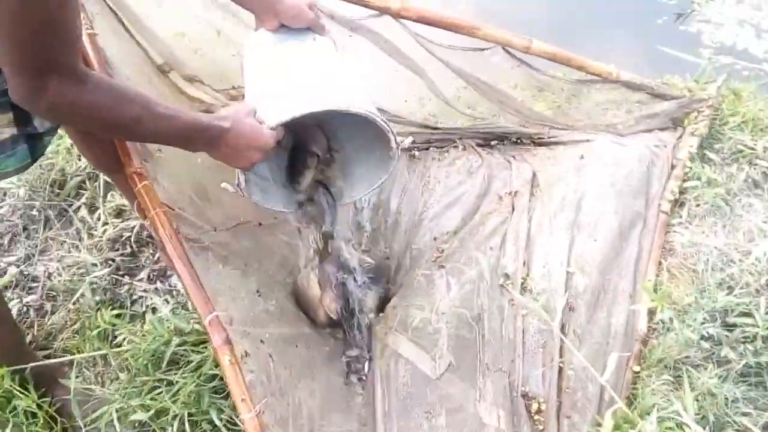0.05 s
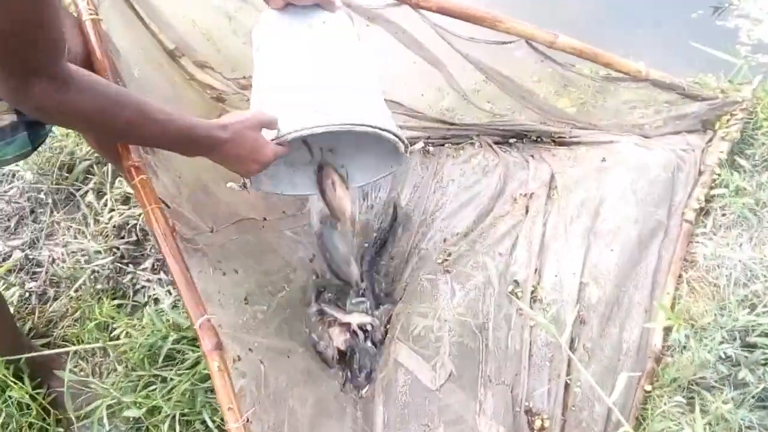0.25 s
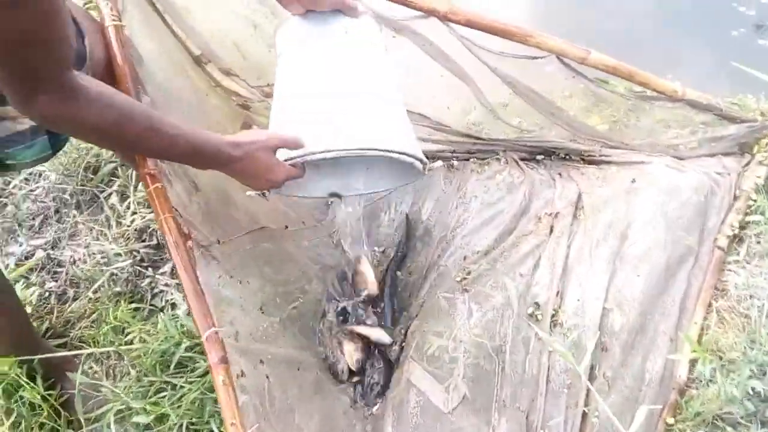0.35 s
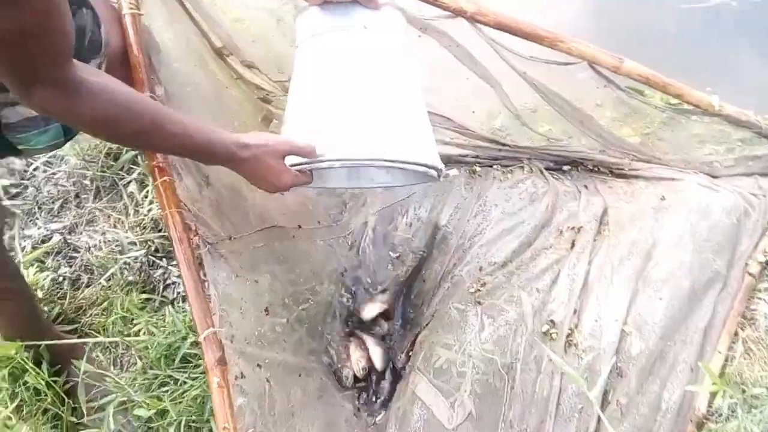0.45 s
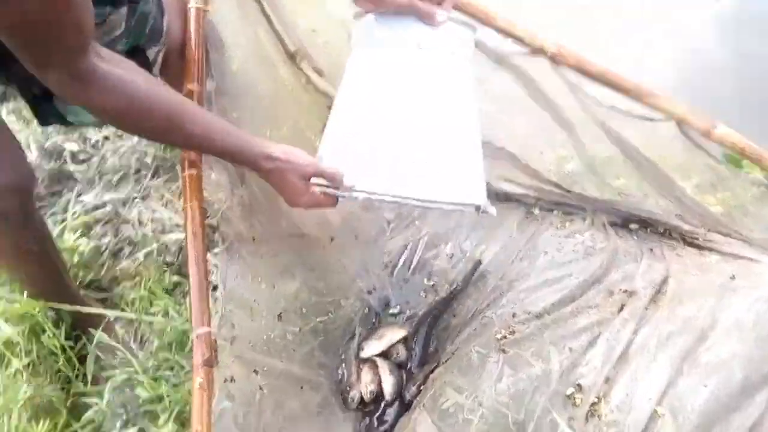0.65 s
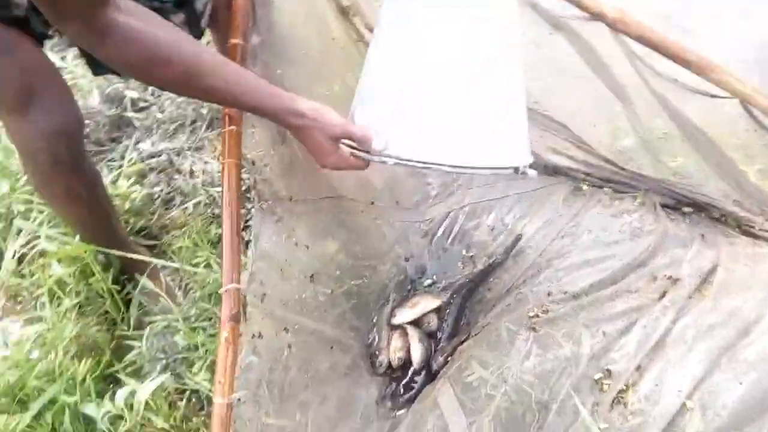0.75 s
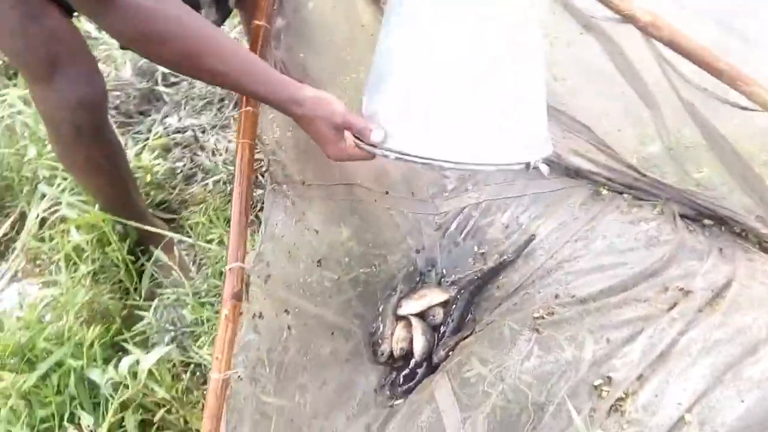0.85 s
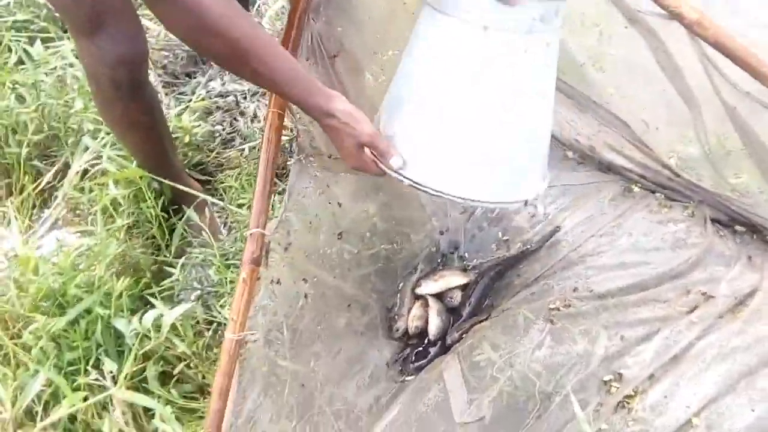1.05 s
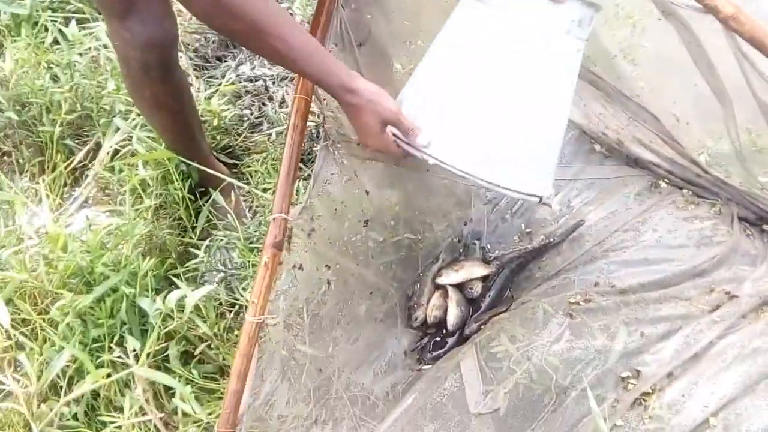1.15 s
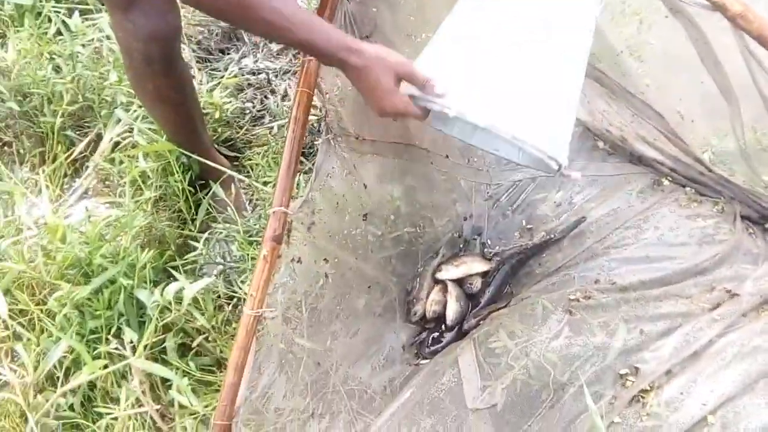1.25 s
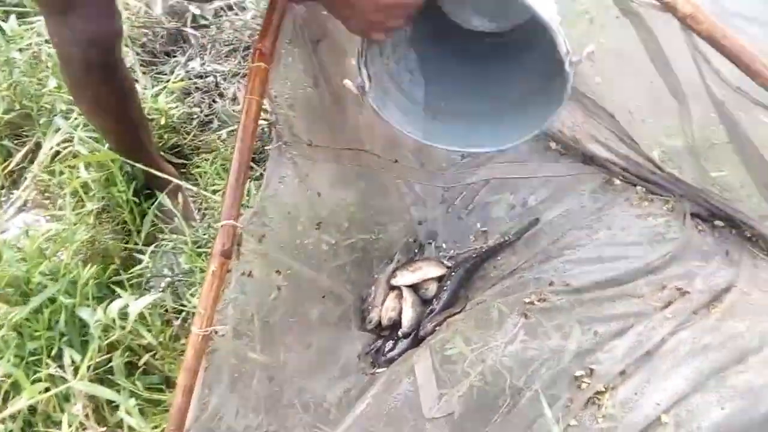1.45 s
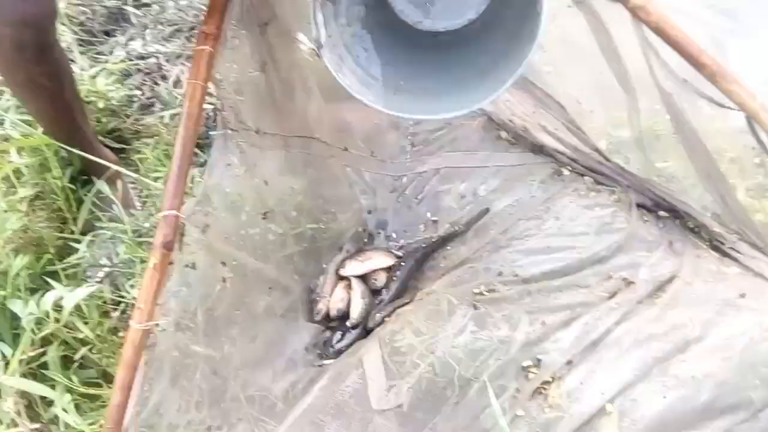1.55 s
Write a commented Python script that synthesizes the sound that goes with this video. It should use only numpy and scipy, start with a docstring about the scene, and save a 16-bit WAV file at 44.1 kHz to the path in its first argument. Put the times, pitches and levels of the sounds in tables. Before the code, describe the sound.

Small wet fish slide and slap onto a net for the first 0.6 seconds, with bubbly pops, ticking droplets and one loud knock of a metal bucket at 0.4. A thin click falls in a lull near 0.75. From 0.9 to 1.3 the bucket knocks several times, barely ringing. The fish flap wetly again around 1.5. Everything is close and echoless, over a soft outdoor hiss and faint low hum.

```python
"""Fish tipped from a bucket

Small wet fish slide out of a metal bucket and slap onto a net beside a pond.
The bucket knocks as it is shaken empty, and the hand holding it keeps the ringing short.
Bubbles pop, droplets tick and the fish wriggle on the wet mesh.
Behind it all are a soft outdoor hiss and a low wavering hum."""
import sys
import numpy as np
from scipy import signal
from scipy.io import wavfile

SR = 44100
rng = np.random.default_rng(int(sys.argv[2]) if len(sys.argv) > 2 else 0)


def wav_out(sig):
    """Save sig, one row per channel (or a flat mono array), as 16-bit PCM at SR to the path in sys.argv[1]."""
    wavfile.write(sys.argv[1], SR, np.round(np.clip(np.atleast_2d(sig).T, -1, 1) * 32767).astype(np.int16))


N = 70560
TIME = np.arange(N) / SR
EDGES = 22 * 2 ** (np.arange(30) / 3)  # Hz, three bands to the octave
CENTRES, WIDTHS = np.sqrt(EDGES[1:] * EDGES[:-1]), np.diff(EDGES)


def from_db(db):
    """Turn decibels into a gain to multiply by."""
    return 10 ** (np.asarray(db) / 20)


def rms_one(x):
    """Scale a signal to an average power of 1."""
    return x / np.sqrt(np.mean(x ** 2) + 1e-20)


def in_time(rows):
    """Join (time, level) points into a gain for every sample."""
    return from_db(np.interp(TIME, *np.transpose(rows)))


def at_hz(points, hz):
    """Read a level between (frequency, level) points, with octaves evenly spaced."""
    freqs, levels = np.transpose(points)
    return np.interp(np.log(hz), np.log(freqs), levels)


def drift(rate):
    """A smooth random wobble of about 1 either way; a higher rate (Hz) wobbles faster."""
    r = np.exp(-20 * np.pi * rate / SR)
    slow = signal.lfilter([1], [1, -2 * r, r * r], rng.standard_normal(N // 10 + 4002))[4000:]
    return np.interp(np.arange(N) / 10, np.arange(len(slow)), rms_one(slow))


def noise_bands():
    """Noise split into equally strong bands, from low to high."""
    white = rng.standard_normal((2, N + SR // 2))
    bands = []
    for k in range(len(CENTRES)):
        band_pass = signal.butter(2, EDGES[k:k + 2], "band", fs=SR, output="sos")
        bands.append(rms_one(signal.sosfilt(band_pass, white[k % 2])[-N:]))
    return np.array(bands)


def band_gains(db_per_hz):
    """Share a total power of 1 among the bands to give noise a tone colour."""
    gain = from_db(db_per_hz) * np.sqrt(WIDTHS)
    return gain / np.linalg.norm(gain)


def fade(age, t60):
    """Die away from age zero; the fade time t60 is the seconds it takes to drop 60 dB."""
    return np.exp(-np.log(1000) * np.clip(age / t60, 0, 10))


def burst(start, swell, t60):
    """A loudness shape that swells, then fades."""
    return np.clip((TIME - start) / swell, 0, 1) * fade(TIME - start - swell, t60)


def ring(clicks, hz, t60):
    """Each click starts a fading tone as strong as itself."""
    r, w = np.exp(-np.log(1000) / (t60 * SR)), 2 * np.pi * hz / SR
    return signal.lfilter([0, np.sin(w)], [1, -2 * r * np.cos(w), r * r], clicks + 1e-18)


# Tone colour of the outdoor hiss: f/Hz, relative level/dB
HISS_COLOUR = [(25, -4.5), (70, 9), (150, 4), (300, -1), (550, -12), (1100, 0.5), (2000, -3), (4000, 2.5),
               (6200, 0), (8000, -9.5), (10000, -13), (12500, -40), (16000, -22)]
# How loud the hum is over time: t/s, level/dB
HUM_LEVELS = [(0, -66), (.12, -59.5), (.42, -56.5), (.55, -73), (.72, -97), (.85, -63), (.91, -55.5),
              (1.14, -56), (1.32, -82), (1.44, -56), (1.6, -67)]


def outdoors(hiss_db=-53.5, flicker_db=3.7, hum_hz=74, waver=0.027, flutter_db=1):
    """A soft flickering hiss, and a low hum that wavers in pitch and loudness."""
    gains = band_gains(at_hz(HISS_COLOUR, CENTRES))
    hiss = sum(g * band * from_db(flicker_db * drift(13)) for g, band in zip(gains, noise_bands()))
    pitch = hum_hz * (1 + waver * drift(8.8))
    hum = np.sqrt(2) * np.sin(2 * np.pi * np.cumsum(pitch) / SR)
    return from_db(hiss_db) * hiss + in_time(HUM_LEVELS) * hum * from_db(flutter_db * drift(18))


# Tone colour of wet skin, sliding or slapping: f/Hz, relative level/dB
WET_TONE = [(100, -16), (300, -4), (520, -27), (850, -11.5), (1200, 0), (2100, 2), (4000, -0.5), (6200, 2),
            (8000, -10.5), (12000, -15), (16000, -23)]
# How loudly fish and water slide, which the spatter follows too: t/s, level/dB
SLIDE_LEVELS = [(0, -51.5), (.06, -48), (.15, -42.5), (.19, -45.5), (.225, -41), (.29, -45.5), (.33, -39.5),
                (.43, -38), (.5, -44.5), (.58, -43), (.61, -49), (.69, -52), (.76, -63), (.85, -62),
                (.93, -51.5), (1.12, -51), (1.25, -54), (1.41, -52), (1.47, -58.5), (1.505, -51),
                (1.54, -42.5), (1.6, -43.5)]


def sliding(pops_per_s=1600, ring_cycles=14.5, spread_db=3.5, flicker_db=3):
    """Tiny bubbles and films of water pop between the sliding fish, over a wet rustle."""
    sizes = from_db(spread_db * np.minimum(rng.exponential(1, N), 4)) * rng.choice([-1, 1], N)
    clicks = sizes * (rng.random(N) < pops_per_s / SR)
    pitches = np.geomspace(1100, 10000, 28)
    chosen = rng.integers(0, len(pitches), N)  # each pop gets a random pitch
    pops = sum(from_db(at_hz(WET_TONE, hz)) * hz * ring(clicks * (chosen == k), hz, ring_cycles / hz)
               for k, hz in enumerate(pitches))
    shared_flicker = 0.79 * drift(89)
    rustle = sum(g * band * from_db(flicker_db * (shared_flicker + drift(44)))
                 for g, band in zip(band_gains(at_hz(WET_TONE, CENTRES)), noise_bands()))
    return from_db(-3.5) * in_time(SLIDE_LEVELS) * (rms_one(pops) + rms_one(rustle))


# Larger droplets flicked onto the mesh: t/s, level/dB, f/Hz
BIG_DROPLETS = [(0.2448, -23, 6500), (0.2505, -24, 7500), (0.268, -29, 8000), (0.321, -24, 7200),
                (0.4385, -26, 8500), (0.465, -24, 5500), (0.5375, -25, 6000), (0.5688, -17, 6000),
                (0.660, -33, 7000)]


def spatter(drops_per_s=110, fine_db=-8, range_hz=(2450, 7000), fade_s=.002):
    """Fine droplets tick on the mesh while the fish move; a few larger ones stand out."""
    clicks = rng.uniform(.2, 1, N) * rng.choice([-1, 1], N) * (rng.random(N) < drops_per_s / SR)
    bright = signal.butter(2, range_hz, "band", fs=SR, output="sos")
    fine = from_db(fine_db) * in_time(SLIDE_LEVELS) * rms_one(signal.sosfilt(bright, clicks + 1e-18))
    big = sum(from_db(db) * (TIME >= t) * fade(TIME - t, fade_s) * np.cos(2 * np.pi * hz * (TIME - t))
              for t, db, hz in BIG_DROPLETS)
    return fine + big


# Fish hitting the net and each other:
# t/s, level/dB, swell/s, fade/s, centre f/Hz, level change away from the centre/dB
FISH_SLAPS = [(0.006, -39.5, 0.0045, 0.078, 4920, -10), (0.133, -40.5, 0.0049, 0.081, 3520, -6),
              (0.2, -38, 0.0045, 0.075, 5100, -11), (0.235, -34, 0.0022, .025, 4800, -19),
              (0.2447, -29.5, 0.00037, 0.01, 7000, -5), (0.2484, -32.5, .001, .035, 6500, -8.5),
              (0.267, -38, 0.0023, 0.02, 7000, -6), (0.2973, -21, 0.0033, 0.012, 4840, -12),
              (0.303, -37, 0.0011, 0.14, 5200, -3), (0.318, -35.5, 0.0022, 0.037, 6500, -14),
              (0.339, -26.5, 0.0026, 0.027, 3600, -12.5), (0.364, -37.5, 0.0037, 0.035, 3300, -11),
              (0.435, -35.5, 0.0017, .05, 6500, -18), (0.47, -31, 0.0034, 0.043, 5460, -3),
              (0.497, -36.5, 0.0017, 0.068, 3500, 2), (0.522, -33, .002, 0.037, 2000, 1),
              (0.529, -31, 0.0053, 0.052, 4540, -10.5), (0.552, -38, .001, 0.037, 3930, -25),
              (0.560, -27.5, 0.0074, 0.026, 3380, -1.5), (0.6176, -37.5, 0.00044, 0.023, 2700, -2),
              (0.902, -44, .001, 0.052, 4270, -1), (1.052, -23.5, 0.0035, 0.047, 7800, -21),
              (1.3748, -40, .001, 0.01, 6000, -10), (1.395, -44.5, 0.0033, 0.2, 6150, -18),
              (1.484, -42, 0.0031, 0.035, 4500, -9), (1.514, -39.5, 0.0021, 0.071, 3500, -5),
              (1.53, -36.5, 0.0062, 0.032, 3240, -5.5)]


def slaps(width_octaves=0.42, rough_db=2.5):
    """Wet skin lands and peels off: a crackling burst of noise shaped around one broad pitch."""
    noise, out = noise_bands(), np.zeros(N)
    crackle = from_db(rough_db * drift(660))
    for start, db, swell, t60, hz, sides_db in FISH_SLAPS:
        hump = np.exp(-.5 * (np.log2(CENTRES / hz) / width_octaves) ** 2)
        gains = band_gains(at_hz(WET_TONE, CENTRES) + sides_db * (1 - hump))
        shape = burst(start, swell, t60)
        slap = shape * crackle * (gains @ noise)
        out += from_db(db) * slap * np.linalg.norm(shape) / np.linalg.norm(slap)
    return out


# Dull bumps: t/s, level/dB, f/Hz, fade/s
DULL_BUMPS = [(0.022, -44.5, 97, .09), (0.246, -38.5, 81, 0.056), (0.299, -46, 168, .03),
              (0.381, -33, 310, .055), (0.995, -43, 280, .05), (0.807, -39.5, 88, 0.055)]


def bumps(swell_s=0.0038):
    """Soft thumps, each a low tone that is gone after a few swings."""
    return sum(from_db(db) * burst(t, swell_s, t60) * np.sin(2 * np.pi * hz * (TIME - t))
               for t, db, hz, t60 in DULL_BUMPS)


# Knocks on the bucket, with levels before the next two tables shape them:
# t/s, thud/dB, clatter/dB, crack/dB, ring/dB, contact/s, crack's fade/s, struck spot's f/Hz
BUCKET_KNOCKS = [(0.076, -53, -40, -46, -50, .004, 0.098, 1110),
                 (0.092, -59, -37.5, -50, -49.5, 0.0036, 0.089, 1250),
                 (0.3803, -31.5, -17.5, -15.5, -27.5, 0.0068, 0.066, 2090),
                 (0.416, -80, -41, -47, -41.5, .012, 0.082, 1200),
                 (0.445, -63, -29, -59, -44.5, 0.011, 0.062, 1100),
                 (0.464, -46, -42, -30, -43.5, .005, 0.037, 1060),
                 (0.860, -50, -37, -55, -51, 0.0022, 0.056, 1250),
                 (0.954, -59, -41, -48, -48.5, 0.0027, .06, 1700),
                 (0.995, -38.5, -30.5, -36.5, -41.5, 0.0057, 0.065, 690),
                 (1.012, -36.5, -49, -40, -40.5, 0.0048, 0.053, 1940),
                 (1.0504, -32.5, -25, -21.5, -26.5, 0.0061, 0.044, 1180),
                 (1.1046, -48, -36, -41, -47, 0.0018, .06, 1470),
                 (1.138, -38, -30.5, -35.5, -45, 0.0027, 0.065, 1700),
                 (1.151, -50, -46, -44, -50, .002, 0.078, 1720),
                 (1.205, -43.5, -47, -59, -65, 0.0027, 0.092, 690),
                 (1.289, -73, -54, -66, -47, .004, .07, 1100),
                 (1.309, -49.5, -31, -41, -43, 0.0051, 0.068, 1560),
                 (1.349, -69, -53, -60, -48.5, 0.0034, 0.054, 1110)]
# Tone colour of a knock's noise: f/Hz, relative level/dB
KNOCK_TONE = [(60, -7), (150, -4.5), (300, 6), (470, -3), (750, 1.5), (1100, -2), (2000, 0.5), (2700, -6.5),
              (4000, -2.5), (6200, -8.5), (8500, -21), (12000, -28.5), (16000, -33)]
# Tones the bucket wall rings with: f/Hz, relative level/dB, fade/s
WALL_TONES = [(315, -21, .045), (568, -17, 0.12), (702.4, -15, 0.11), (850, -15.5, 0.11),
              (1061.4, -9, 0.069), (1128.6, -6.5, 0.11), (1250, -17.5, 0.1), (1454, -4.5, 0.16),
              (1604, -3.5, 0.054), (1709, -5.5, 0.11), (1866, -7, 0.12), (1983, -6, 0.049),
              (2090, -6.5, 0.099), (2269, -3.5, 0.062), (2930, -11, .06), (3455, -16, 0.075),
              (3754, -5, 0.057), (6980, -5.5, 0.027)]


def bucket_knocks(swell_s=.002, spread_db=3, spot_boost_db=8.5, spot_octaves=0.076):
    """Thin metal clatters, then the wall rings on, with a boost near the struck spot's pitch."""
    noise, out = noise_bands(), np.zeros(N)
    colour = band_gains(at_hz(KNOCK_TONE, CENTRES))
    zones = np.log([445, 1230, 3800])  # thud, clatter and crack, in Hz
    fade_scale = np.interp(np.log(CENTRES), zones, [0.79, 1.45, 1.0])[:, None]  # clatter lasts longest
    for start, thud_db, clatter_db, crack_db, ring_db, contact, t60, spot_hz in BUCKET_KNOCKS:
        span = slice(int(start * SR), int(start * SR) + SR // 4)
        age = TIME[span] - TIME[span][0]
        gains = colour * from_db(np.interp(np.log(CENTRES), zones, [thud_db, clatter_db, crack_db]))
        clatter = gains @ (noise[:, span] * fade(age - swell_s - contact, t60 * fade_scale))
        out[span] += np.minimum(age / swell_s, 1) * clatter
        chance = rng.standard_normal((len(WALL_TONES), 2))
        for (hz, db, tone_t60), (strength, phase) in zip(WALL_TONES, chance):
            build_s = min(10 / hz, 0.0095)  # a tone builds up over ten swings at most
            shape = np.minimum(age / build_s, 1) * fade(age - build_s, tone_t60)
            boost_db = spot_boost_db * np.exp(-.5 * (np.log2(hz / spot_hz) / spot_octaves) ** 2)
            tone = shape * np.sin(2 * np.pi * (hz * age + phase))
            out[span] += from_db(ring_db + db + boost_db + spread_db * strength) * tone
    return out


# Bubbles and air pockets popping under the fish:
# t/s, level/dB, starting f/Hz, swell/s, fade/s, pitch rise/(octaves per s)
BUBBLE_POPS = [(0.077, -39.5, 1157, 0.0026, 0.03, 4.4), (0.160, -28.5, 1890, 0.0013, 0.036, 138),
               (0.299, -22, 5900, .001, 0.011, 5), (0.2998, -19, 3750, .001, .008, 23),
               (0.341, -24.5, 2910, 0.0011, .015, 82), (0.3805, -24, 690, 0.0019, .02, 15),
               (0.4885, -29, 3800, 0.0011, .015, 30), (0.523, -32, 1404, .002, 0.031, 3.3),
               (0.565, -27, 2783, 0.0015, 0.034, 18), (0.6185, -35, 2100, 0.0011, .03, 5),
               (0.902, -27.5, 2045, 0.00073, 0.015, 8), (0.911, -35, 1000, 0.0036, 0.028, 3),
               (0.931, -39.5, 1036, .004, .035, 3), (0.998, -39.5, 684, 0.0045, 0.11, 1.6),
               (1.139, -36, 553, 0.0024, .06, 1.3), (1.294, -38, 1057, 0.0037, .045, 1),
               (1.307, -40, 694, 0.0044, 0.023, 11)]


def bubbles():
    """Each bubble rings briefly while its pitch rises, by two octaves at most."""
    out = np.zeros(N)
    for start, db, hz, swell, t60, rise in BUBBLE_POPS:
        pitch = hz * 2 ** np.minimum(rise * np.clip(TIME - start, 0, t60), 2)
        tone = np.sin(2 * np.pi * np.cumsum(pitch * (TIME > start)) / SR)
        out += from_db(db) * burst(start, swell, t60) * tone
    return out


# Tones in one sharp tick close by: f/Hz, level before the low cut/dB, fade/s
TICK_TONES = [(2030, -13.5, 0.0049), (1200, -42, 0.0018), (3850, -12.5, 0.0016), (6500, -17, 0.0012)]


def tick(start_s=.744, low_cut_hz=960):
    """A single thin, dry click that dies within a few thousandths of a second."""
    click = np.zeros(N)
    click[int(start_s * SR)] = 1
    tones = sum(from_db(db) * ring(click, hz, t60) for hz, db, t60 in TICK_TONES)
    return signal.sosfilt(signal.butter(4, low_cut_hz, "high", fs=SR, output="sos"), tones)


def scene():
    """All the sounds in one channel, close by in the open air, with no echo."""
    mix = bucket_knocks() + slaps() + bubbles() + tick() + sliding() + spatter() + bumps() + outdoors()
    return mix[None]


def record(dry):
    """Cut away the highest treble, above 16000 Hz."""
    return signal.sosfilt(signal.ellip(10, .2, 80, 16000, fs=SR, output="sos"), dry)


dry = scene()
out = record(dry)
wav_out(out)
```